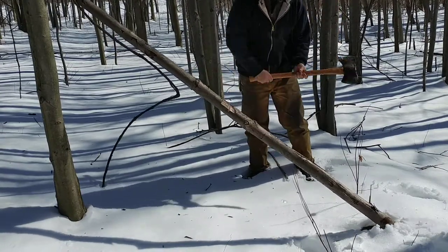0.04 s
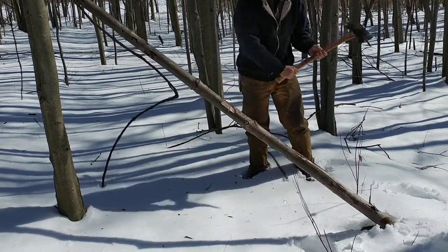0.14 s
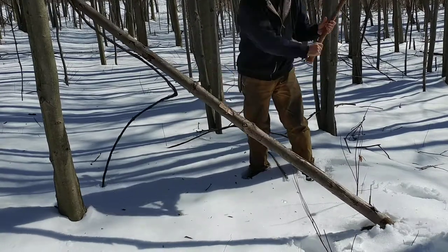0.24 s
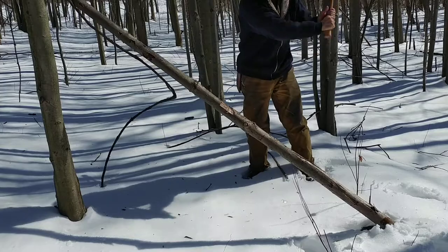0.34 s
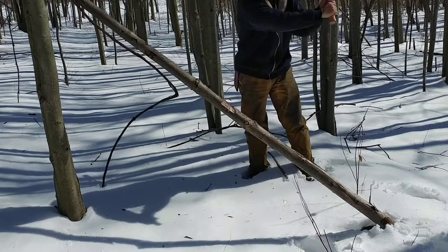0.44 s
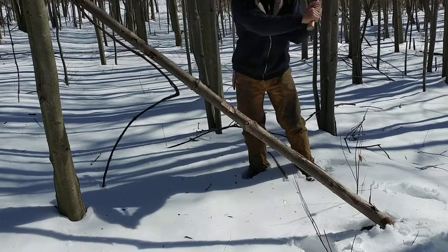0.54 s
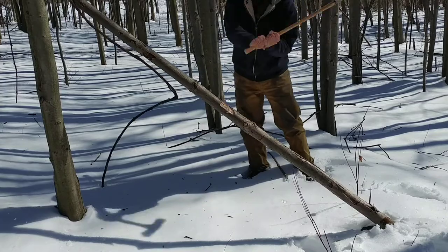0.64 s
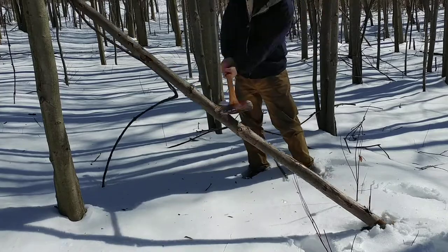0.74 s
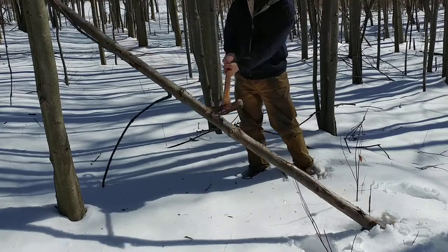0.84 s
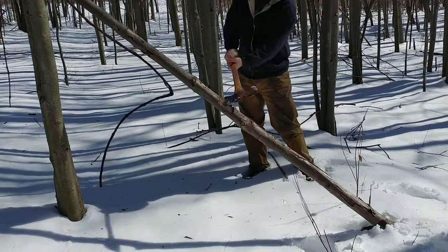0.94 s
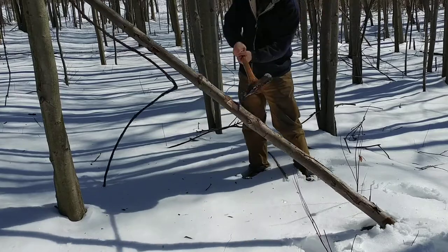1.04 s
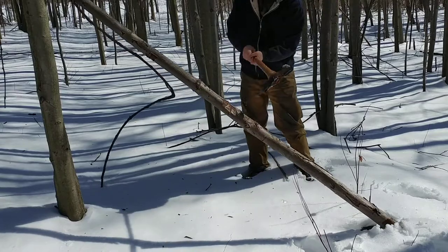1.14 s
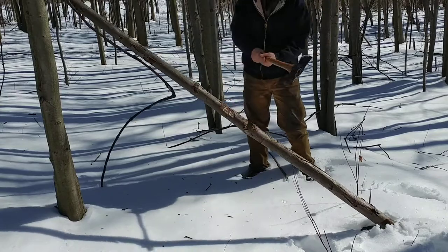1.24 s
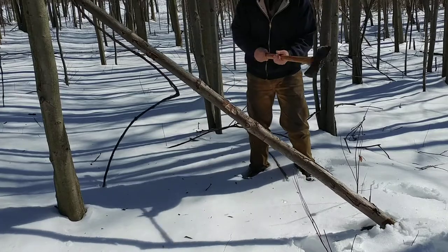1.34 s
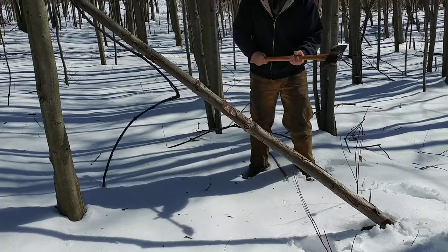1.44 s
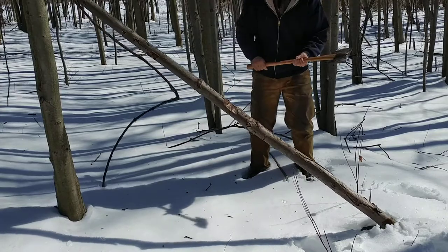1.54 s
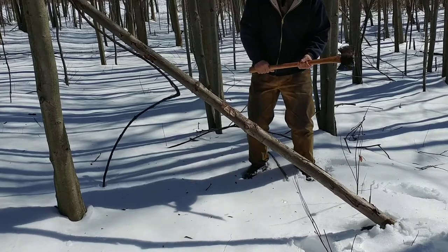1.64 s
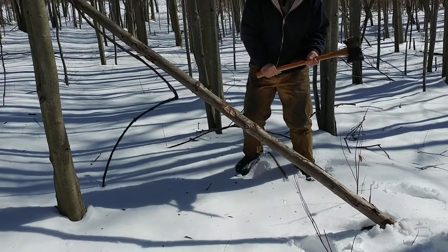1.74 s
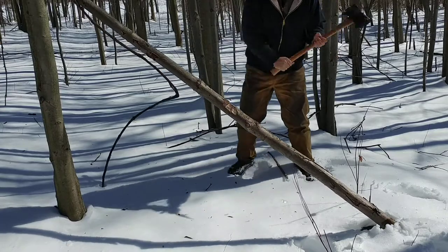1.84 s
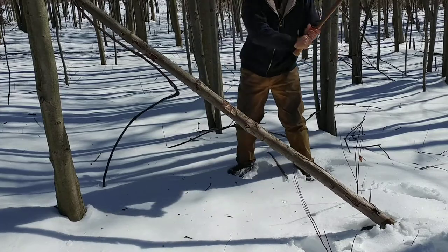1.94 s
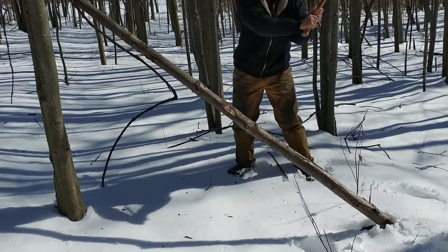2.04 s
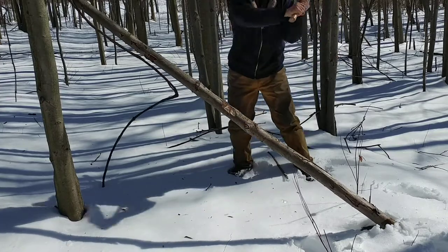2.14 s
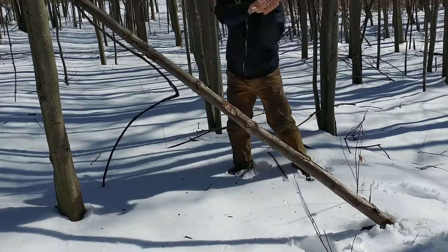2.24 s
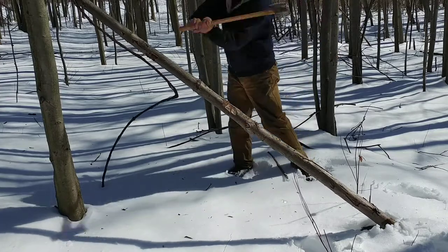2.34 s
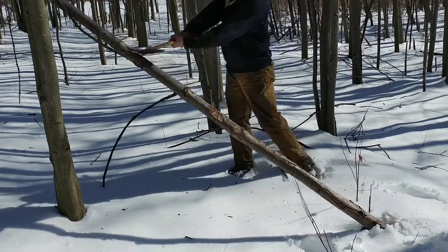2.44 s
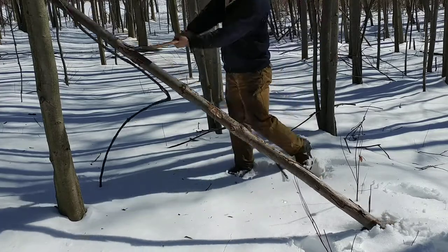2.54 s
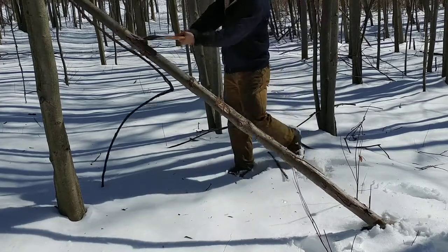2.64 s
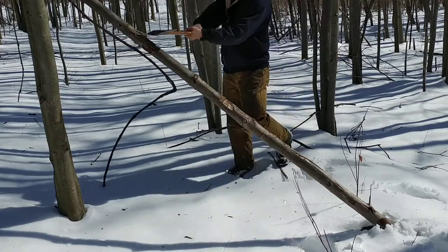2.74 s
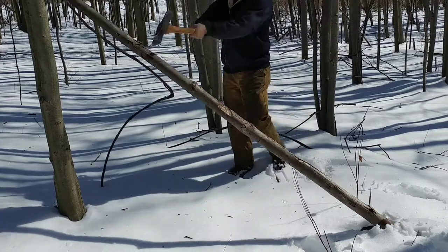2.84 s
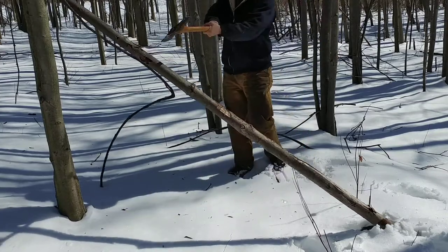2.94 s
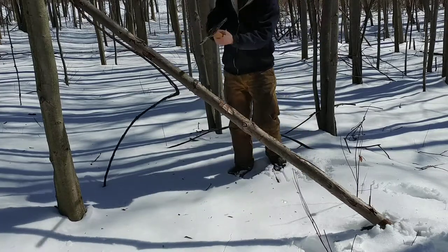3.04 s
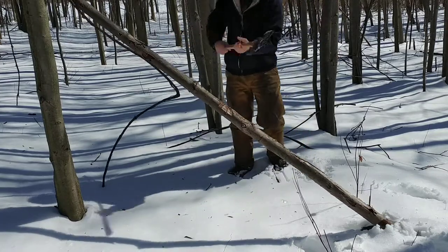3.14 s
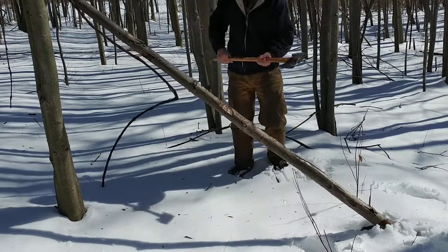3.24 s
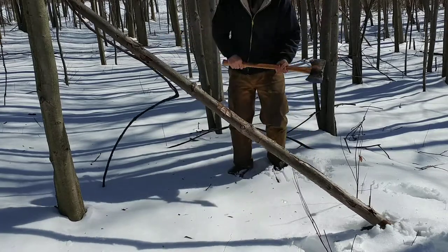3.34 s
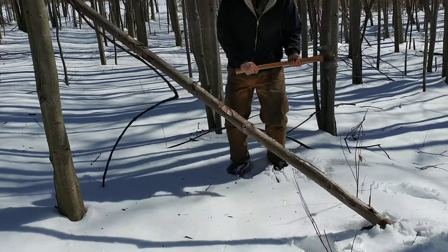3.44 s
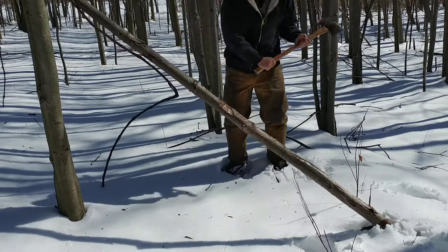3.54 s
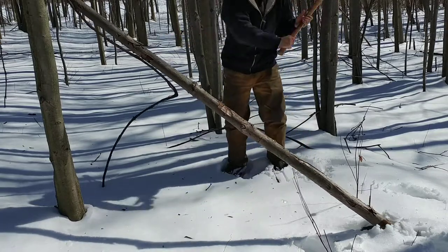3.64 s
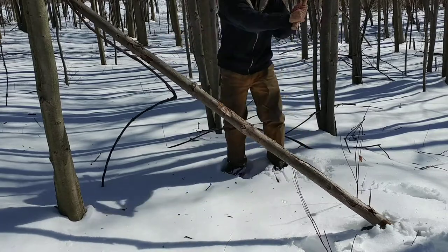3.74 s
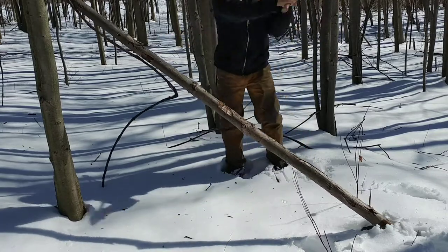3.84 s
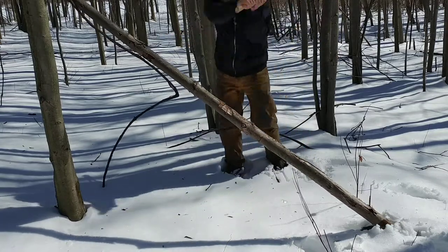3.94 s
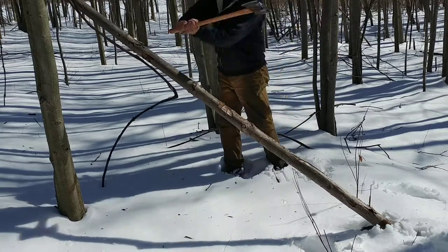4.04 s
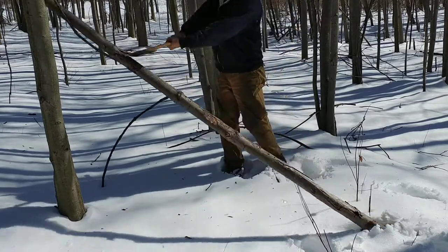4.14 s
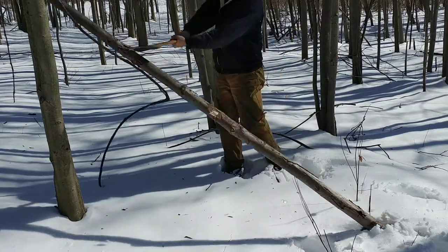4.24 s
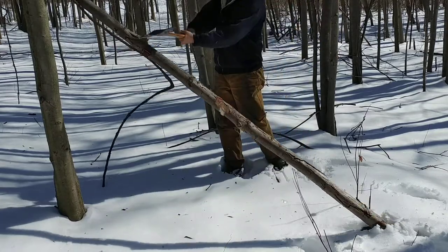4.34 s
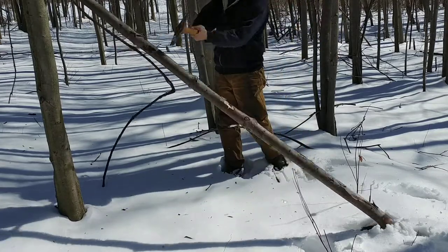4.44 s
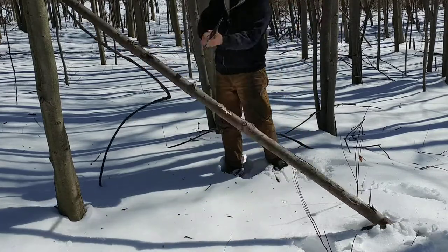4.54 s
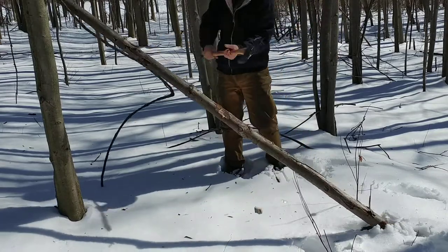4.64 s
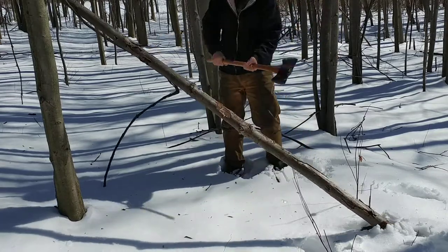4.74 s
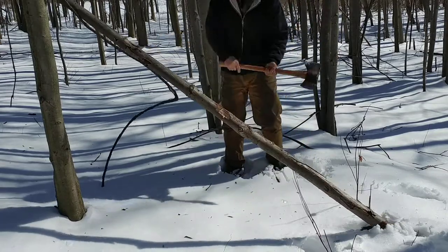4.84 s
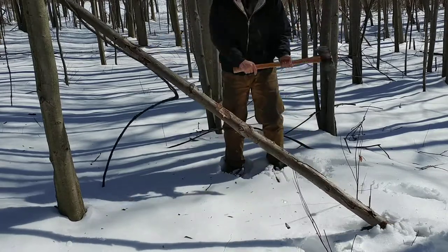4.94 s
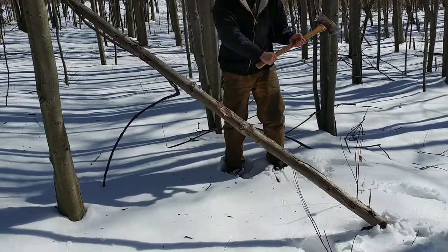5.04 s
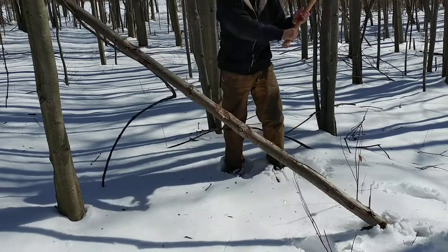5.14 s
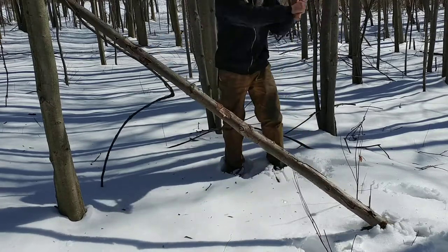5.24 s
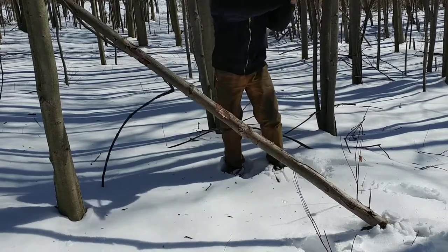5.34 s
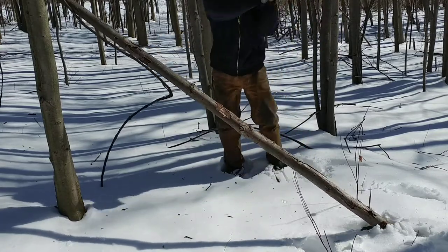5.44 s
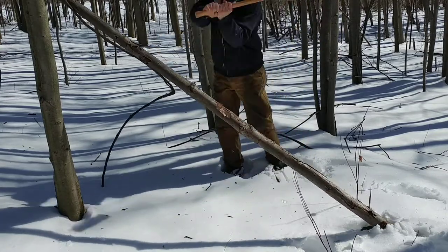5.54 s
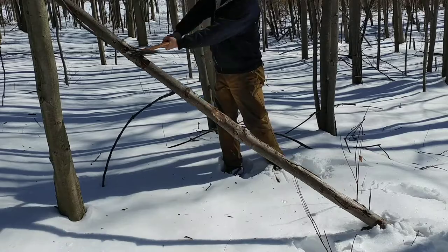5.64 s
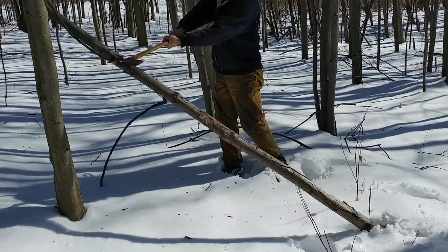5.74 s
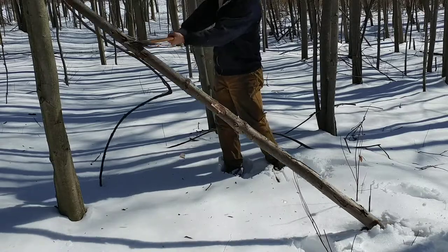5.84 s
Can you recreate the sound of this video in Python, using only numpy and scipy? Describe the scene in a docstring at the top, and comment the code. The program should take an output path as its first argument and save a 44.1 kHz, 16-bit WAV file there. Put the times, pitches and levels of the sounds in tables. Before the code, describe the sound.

Quiet winter woods with faint lumpy low wind and soft hiss; small jacket ticks. Then an axe strikes a dry leaning pole four times, roughly every one and a half to two seconds. Each sharp crack brings hollow, short-ringing knocks as the pole bounces, dull ground thumps, sifting snow and trunk echoes. Close stereo camera microphone, pole slightly left, uneven treble.

```python
"""Lumpy low wind and the faint murmur and hiss of snowy woods come first, noises in shaped colours, with a few
small cracks, jacket ticks and rustles of filtered noise. Then an axe chops a leaning dead pole: noise bursts
crack the wood, sines and ringing modes sound the dry pole as it bounces against its neighbours, and low noise
thumps the ground. Shaken snow sifts down as swelling hiss; trunks and far slopes scatter the sound back as
noise tails. A small stereo camera microphone with uneven treble hears it, the pole a little to the left."""
import sys
import numpy as np
from scipy import signal
from scipy.fft import rfft, irfft, next_fast_len
from scipy.io import wavfile
from scipy.ndimage import map_coordinates

SR = 44100
rng = np.random.default_rng(int(sys.argv[2]) if len(sys.argv) > 2 else 0)


def pcm_store(signal):
    """Save signal as 16-bit PCM."""
    levels = np.round(np.clip(np.atleast_2d(signal), -1, 1) * 32767)
    wavfile.write(sys.argv[1], SR, levels.astype(np.int16).T)


def voltage_ratio(level):
    """Linear amplitude factor for a level in decibels (scalar or array-like)."""
    return 10 ** (np.asarray(level, float) / 20)


N = 259308  # samples


def unit(x):
    """Scaled to rms 1."""
    return x / np.sqrt(np.mean(x ** 2) + 1e-20)


def along(points, hz):
    """Reads a curve of (Hz, value) points on a log frequency axis."""
    f, v = np.transpose(points)
    return np.interp(np.log(hz + 1), np.log(f + 1), v)


def curves(rows):
    """One value per sample for each column after the time."""
    s, *cols = np.transpose(rows)
    return [np.interp(np.arange(N) / SR, s, c) for c in cols]


def wobble(rate):
    """A smooth random curve, rate knots a second."""
    knots = rng.standard_normal(int(N * rate / SR) + 4)
    return map_coordinates(knots, [np.arange(N) * rate / SR])


def grit(n, depth_db, size):
    """Random gain steps, size samples long."""
    return voltage_ratio(depth_db * rng.standard_normal(n // size + 1)).repeat(size)[:n]


def filtered(x, response):
    """x times a complex response of frequency."""
    n = x.shape[-1]
    m = next_fast_len(n + 4096)
    return irfft(rfft(x, m) * response(np.fft.rfftfreq(m, 1 / SR)), m)[..., :n]


def resonance(f, hz, width):
    """Response of one causal resonance, 1 at its centre."""
    return 1j * f * width / (hz * hz - f * f + 1j * f * width)


def pair(n, alike):
    """Two noises with correlation alike."""
    a, b = rng.standard_normal((2, n))
    turn = np.arccos(np.clip(alike, 0, 1)) / 2
    return np.cos(turn) * a + np.sin(turn) * b * np.array([[1], [-1]])


def rush(spectrum, alike):
    """Stereo noise of rms 1 in a given colour."""
    return unit(filtered(pair(N, alike), lambda hz: voltage_ratio(along(spectrum, hz))))


def add(track, s, sound):
    """Lays a stereo sound on the track at s seconds."""
    part = track[:, round(s * SR):][:, :sound.shape[1]]
    part += sound[:, :part.shape[1]]


# The wind at the microphone ports. Each row: time in seconds, strength in dB.
WIND_STRENGTH = [(0.0, -63.5), (0.9, -65), (1.1, -54.5), (1.79, -67), (2.88, -53), (4.11, -62), (4.45, -53),
                 (5.36, -65), (5.88, -50)]
# Colour of that wind. Each row: frequency in Hz, relative level in dB.
WIND_COLOUR = [(13, -45.5), (22, -19), (36, -8.5), (59, 0.5), (135, -15), (291, -27.5), (330, -22),
               (430, -53.5), (730, -120)]
# Colour of the far woods. Each row: frequency in Hz, relative level in dB.
MURMUR_COLOUR = [(150, -36), (250, -9.5), (295, -16), (433, -9.5), (489, 1.5), (576, 2.5), (692, -5.5),
                 (914, -9.5), (997, -11), (1170, -18), (2000, -26.5), (2600, -67), (4400, -120)]


def air():
    """Slow random gains make the low wind lumpy on each port; the far woods murmur as wavering noise."""
    wind_db, = curves(WIND_STRENGTH)
    lumps = voltage_ratio(0.88 * wobble(7.5) + 0.94 * np.array([wobble(1.8), wobble(4.1)]))
    wind = voltage_ratio(wind_db) * unit(lumps * rush(WIND_COLOUR, alike=1.0))
    murmur = voltage_ratio(-63.5 + 1.5 * wobble(12.0)) * rush(MURMUR_COLOUR, alike=0.38)
    return wind + murmur


# Snow shaken from the branches by each blow. Each row: start in seconds, peak level in dB.
SNOW_SHOWERS = [(0.9, -59.5), (2.569, -53), (4.26, -50.5), (5.8, -54)]
# Colour of soft hiss, for snow and rubbing cloth. Each row: frequency in Hz, relative level in dB.
SOFT_HISS = [(900, -46.5), (1500, -14), (3000, -1), (8000, -3), (16000, -3)]


def rustle():
    """Soft hiss that swells as shaken snow sifts down, with a thin wavering band high in the treble."""
    hiss_db, shower_peak_s = -65, 0.25
    level = voltage_ratio(hiss_db)
    for s, db in SNOW_SHOWERS:
        since = np.clip(np.arange(N) / SR - s, 0, None) / shower_peak_s
        level = level + voltage_ratio(db) * since * np.exp(1 - since)
    flicker = voltage_ratio(3.3 * wobble(9.8) + 1.8 * wobble(390))
    hiss = level * unit(flicker * rush(SOFT_HISS, alike=0.13))
    thin = unit(filtered(pair(N, alike=0.2), lambda f: resonance(f, 11300, 350) ** 2))
    return hiss + voltage_ratio(-75 + 3 * wobble(3.2)) * thin


# Splitting fibres, chips and twigs close by. Each row: start in seconds, level in dB (before a 3 dB cut),
# centre in Hz, scatter in dB (before a 14 dB cut).
WOOD_CRACKS = [(0.1317, -44.5, 10000, -30), (0.5841, -41, 3990, -32), (0.9026, -4.5, 7020, -17),
               (0.9924, -24, 9950, -4), (0.9967, -14, 4980, -7.5), (0.9994, -5, 9300, -30.5),
               (1.024, -15, 7000, -13.5), (1.295, -37, 2655, -18), (1.3704, -37.5, 6850, -26),
               (1.448, -45.5, 3640, -24), (1.4644, -62, 8200, -16.5), (1.4855, -43, 7640, -26),
               (1.5713, -46, 7700, -31), (1.719, -52.5, 10680, -8), (1.794, -51, 10800, -8.5),
               (2.5706, -7, 7590, -17.5), (2.6221, -6.5, 7050, -9), (2.6444, -19, 7730, -12.5),
               (2.7473, -18, 2640, -6.5), (2.7539, -10.5, 3370, -12), (2.7555, -13, 1900, -16),
               (2.7605, -13, 2200, -20), (2.935, -31, 10500, -15), (2.978, -35, 10500, -18),
               (3.0826, -40, 7730, -17.5), (3.114, -34.5, 2370, -6.5), (3.314, -26, 7670, -17.5),
               (3.3135, -27, 1700, -26), (4.1178, -49.5, 7900, -19), (4.2555, -12.5, 8900, -9),
               (4.2586, -9, 9260, -28.5), (4.3082, -41, 2800, 10), (4.345, -22, 3000, -9.5),
               (4.3994, -40, 3400, -9), (4.413, -31, 10500, -17), (4.501, -34, 10300, -20),
               (4.434, -29, 10000, -8.5), (4.468, -29.5, 9600, -13.5), (4.4785, -39.5, 10300, -9),
               (4.568, -21.5, 10500, -24), (5.003, -35.5, 7400, -43), (5.1038, -33, 10400, -34.5),
               (5.3584, -31.5, 11340, -10), (5.374, -33, 10600, -31.5), (5.394, -32, 10500, -25),
               (5.64, -47.5, 8000, -10.5), (5.8034, -7, 10500, -16)]
# How long the trunks scatter sound. Each row: frequency in Hz, time to fall 60 dB in seconds.
TRUNK_DECAY = [(300, .5), (1000, 0.35), (3000, 0.52), (8000, 0.38), (15000, 0.33)]


def cracks():
    """A few ms of splintering noise, answered by the lumpy scatter of many trunks, drawn anew each time."""
    out, t = np.zeros((2, N)), np.arange(int(0.7 * SR)) / SR
    for s, db, hz, scatter_db in WOOD_CRACKS:
        breadth = voltage_ratio(17.5 + 0.99 * db)  # louder cracks are broader

        def colour(f):
            peak = resonance(f, hz, 0.5 * hz) ** 2
            broad = resonance(f, 3300, 18000)
            broad = broad / (1 + 1j * f / (2.2 * hz)) ** 2  # rolls off above 2.2 times the centre
            return peak + breadth * broad * (1j * f / (1j * f + 1200)) ** 2

        def blurred(f):  # scatter smears the colour
            return colour(f) + 0.5 * resonance(f, hz, 3.9 * hz)

        splinters = pair(len(t), alike=0.7) * grit(len(t), 4, size=16)
        burst = unit(filtered(splinters, colour)) * np.exp(-(t / 0.0041) ** 2)
        # each frequency of the scatter dies at its own rate
        f, u, z = signal.stft(pair(len(t), alike=0.21), SR, nperseg=256)
        fading = voltage_ratio(-60 * u / along(TRUNK_DECAY, f)[:, None])
        tail = signal.istft(z * fading, SR, nperseg=256)[1][:, :len(t)]
        lumps = grit(len(t), 1.5, size=150)
        tail = unit(filtered(tail * lumps, blurred)) * voltage_ratio(scatter_db - 14)
        add(out, s - 0.0005, voltage_ratio(db - 3.0) * (burst + tail))
    return out


# Small hard ticks of a jacket fastener by the microphone. Each row: start in seconds, level in dB (before a
# 4.5 dB cut), brightness in dB per octave.
JACKET_TICKS = [(0.397, -16, 4.5), (0.4, -26.5, -1), (0.4056, -27, -9.5), (0.5457, -32, -7.5),
                (0.551, -35, -12), (0.5588, -39, -2), (0.7437, -29.5, 4), (0.752, -41.5, 13.5)]
# Resonances of the fastener. Each row: frequency in Hz, width in Hz, relative level in dB.
FASTENER_MODES = [(3000, 600, -20), (5070, 500, -7), (7000, 810, -1.5), (10500, 2400, -7),
                  (13460, 1800, -12)]


def ticks():
    """Brief spiky noise through the fastener's few high resonances, with a faint short wash."""
    out, t = np.zeros((2, N)), np.arange(SR // 5) / SR
    for s, db, bright_db in JACKET_TICKS:
        def colour(f):
            return sum(voltage_ratio(mode_db + bright_db * np.log2(hz / 7000)) * resonance(f, hz, width) ** 2
                       for hz, width, mode_db in FASTENER_MODES)

        spiky = pair(len(t), alike=0.21) * grit(len(t), 2.4, size=16)
        noise = unit(filtered(spiky, colour))
        wash = voltage_ratio(-27.0 - 60 * t / 0.22)
        add(out, s - 0.0005, voltage_ratio(db - 4.5) * noise * (np.exp(-t / 0.0038) + wash))
    return out


# Rubbing cloth and pattering crumbs. Each row: start in seconds, length in seconds (where the swell is down
# to half), level in dB, centre in Hz.
CLOTH_SCRAPES = [(0.521, 0.046, -58, 5070), (0.567, .035, -52, 4840), (1.46, 0.04, -52.5, 8100),
                 (1.82, .06, -68, 7000), (1.928, 0.18, -57.5, 7000), (1.951, 0.13, -59, 3960),
                 (2.243, .1, -64, 5760), (2.909, .07, -47, 9530), (3.318, .12, -57, 8600),
                 (3.523, .18, -58.5, 7000), (3.742, 0.055, -73, 7000), (4.215, 0.031, -46, 5540),
                 (4.555, 0.079, -42, 9300), (4.729, 0.056, -50, 6160), (4.844, .012, -43.5, 7500),
                 (4.853, 0.032, -39.5, 3000), (4.872, 0.04, -44.5, 10700), (5.052, 0.025, -49.5, 9100),
                 (5.112, 0.035, -42.5, 3000), (5.097, 0.043, -41.5, 10100), (5.312, 0.07, -45.5, 3000),
                 (5.312, 0.044, -51, 7550), (5.312, .04, -52, 10500), (5.367, 0.026, -46, 9760)]


def scrapes():
    """Rubbing and pattering are short gritty swells of noise around one broad centre."""
    out = np.zeros((2, N))
    for s, length, db, hz in CLOTH_SCRAPES:
        u = np.arange(int(2 * abs(length) * SR)) / (abs(length) * SR)
        swell = (1 - np.exp(-(u / 0.15) ** 2)) / (1 + u ** 5)
        rough = pair(len(u), alike=0.088)
        rough = rough * grit(len(u), 3.5, size=120) * grit(len(u), 0.76, size=12)

        def colour(f):
            return (0.4 + resonance(f, hz, 0.47 * hz) ** 2) * voltage_ratio(along(SOFT_HISS, f))

        add(out, s, voltage_ratio(db) * swell * unit(filtered(rough, colour)))
    return out


# Blows and bounces of the pole, a little left of the microphone. Each row: start in seconds, level in dB,
# nominal pitch in Hz, brightness in dB per octave.
POLE_KNOCKS = [(0.902, -14, 848, 9.5), (0.912, -18.5, 700, -0.5), (0.919, -5, 611, 2.5),
               (0.931, -11, 640, -13.5), (0.942, -15, 593, 8), (0.96, -19, 800, 5), (0.985, -19, 695, 14),
               (1.009, -15.5, 655, 14.5), (1.022, -30, 728, 27.5), (1.107, -30, 574, 2.5),
               (1.201, -20.5, 697, 8), (1.291, -18.5, 891, 3), (1.517, -41.5, 530, 1.5),
               (2.06, -45, 654, 4.5), (2.101, -47.5, 534, 9), (2.335, -42, 573, -4.5),
               (2.569, -27.5, 555, 24.5), (2.574, -5.5, 739, 8.5), (2.599, -6, 725, 2.5),
               (2.621, -22, 620, 15.5), (2.643, -12.5, 650, 10.5), (2.747, -19.5, 900, 9),
               (2.752, -11.5, 1052, 13.5), (2.761, -20, 642, 13), (2.841, -20, 782, 6),
               (2.888, -19, 738, 4), (3.002, -22, 778, 10), (3.118, -26.5, 663, 14), (3.135, -26.5, 657, 4),
               (3.253, -28, 801, 2.5), (3.312, -34, 643, 1.5), (3.415, -45.5, 550, -1.5),
               (3.887, -47, 587, -4), (3.989, -44, 570, -19), (4.254, -20.5, 577, 3), (4.261, -3.5, 759, 7),
               (4.295, -10.5, 606, 9.5), (4.36, -20.5, 730, 4.5), (4.368, -10.5, 772, 7.5),
               (4.43, -24, 680, 9.5), (4.45, -17, 734, -4), (4.478, -12.5, 895, 5.5),
               (4.522, -13.5, 903, 7.5), (4.539, -26.5, 910, 15), (4.579, -19, 730, 4),
               (4.652, -18, 654, 6.5), (4.668, -24, 640, -5), (4.726, -17.5, 580, 7),
               (4.745, -11, 798, 4.5), (4.791, -22, 600, 6), (4.846, -22, 606, -6), (4.993, -37, 492, -17),
               (5.056, -24.5, 768, 3), (5.13, -38.5, 820, 7.5), (5.353, -24.5, 775, 1),
               (5.365, -29.5, 827, -0.5), (5.381, -28, 710, 1.5), (5.801, -11, 629, 3), (5.806, -7, 788, 9),
               (5.823, -18, 578, 5.5), (5.849, -6, 830, 1.5)]
# Modes of the dry pole. Each row: frequency in Hz, width in Hz, relative level in dB.
POLE_MODES = [(296, 50, -16), (370, 35, -14), (470, 40, -10), (561, 45, -4), (636, 35, -1), (713, 35, 0),
              (790, 40, -5), (845, 30, -4), (931, 40, -5), (1082, 50, -10), (1250, 150, -12),
              (1550, 450, -15), (2100, 900, -18), (3200, 1600, -21)]


def pole():
    """Each contact is a short wooden tock, then the pole's modes ring unevenly, high ones dying first."""
    ring_t60_s = 0.19  # at 700 Hz
    bright_top_hz = 1500  # brightness lifts modes no further above this
    out, t = np.zeros((2, N)), np.arange(SR // 3) / SR
    mode_hz, width, mode_db = np.transpose(POLE_MODES)[:, :, None, None]
    octaves = np.log2(np.minimum(mode_hz, bright_top_hz) / 700)
    fading = voltage_ratio(-60 * t / ring_t60_s * (mode_hz / 700) ** 0.9)
    for s, db, hz, bright_db in POLE_KNOCKS:
        def partial(ratio, life):
            return np.sin(2 * np.pi * ratio * hz * t) * voltage_ratio(-60 * t / life)

        tock = partial(0.96, life=0.033) + voltage_ratio(bright_db - 9.5) * partial(1.528, life=0.011)
        tock *= 1.37 * (1 - np.exp(-t / 0.0009))
        lean = 0.39 + abs(resonance(mode_hz, hz, 1000))  # the place of contact favours its own pitch
        uneven_db = 4.6 * rng.standard_normal(mode_db.shape)
        strength = lean * voltage_ratio(mode_db + bright_db * octaves + uneven_db) / np.sqrt(width)
        noise = pair(len(t), alike=0.51)
        modes = strength * filtered(noise, lambda f: resonance(f, mode_hz, width) ** 2)
        ring = (modes * fading).sum(0) / np.sqrt(np.mean(modes.sum(0) ** 2))
        ring *= voltage_ratio(-10 + 0.7 * bright_db)  # a harder, brighter contact rings the pole more
        ring *= 1 - np.exp(-t / 0.00082)
        add(out, s - 0.001, voltage_ratio(db) * (tock + ring))
    return out


# The pole's foot jolts the ground. Each row: start in seconds, level in dB (before a 5 dB cut), pitch in Hz.
GROUND_THUMPS = [(0.904, -25, 88.5), (0.939, -26.5, 119), (0.999, -28.5, 66), (1.29, -42, 90),
                 (1.99, -43.5, 90.7), (2.1, -45, 86), (2.331, -52, 103), (2.574, -31, 102),
                 (2.631, -25.5, 63), (2.747, -33, 89), (3.119, -51.5, 62), (3.308, -38.5, 56.5),
                 (4.26, -34.5, 68.6), (4.288, -23, 167), (4.37, -26, 64), (4.749, -40, 99),
                 (4.85, -43.5, 115), (4.996, -46.5, 86), (5.62, -52, 68.7), (5.804, -28.5, 91.2),
                 (5.848, -29, 134)]


def thumps():
    """The jolted ground gives dull low noise with a soft start, one broad resonance and a weaker one above."""
    t60_s = 0.34
    out, t = np.zeros((2, N)), np.arange(SR // 2) / SR
    for s, db, hz in GROUND_THUMPS:
        def colour(f):
            return resonance(f, hz, 0.87 * hz) ** 2 + 0.17 * resonance(f, 220, 170) ** 2

        dull = unit(filtered(pair(len(t), alike=1.0), colour))
        soft_start = 1 - np.exp(-t / 0.0066)
        add(out, s, voltage_ratio(db - 5.0 - 60 * t / t60_s) * soft_start * dull)
    return out


def lingering(x, db, rise_s, t60):
    """x through a diffuse noise tail that swells and dies, different at each port."""
    t = np.arange(3 * SR // 2) / SR
    tail = pair(len(t), alike=0.22) * (1 - np.exp(-(t / rise_s) ** 2)) * voltage_ratio(-60 * t / t60)
    return voltage_ratio(db) * signal.fftconvolve(x, tail / np.linalg.norm(tail[0]), axes=1)[:, :N]


def scene():
    """The pole stands a little to the left: near sounds reach that port first, then the far answers come."""
    left_lead_s = 0.000216
    wood, ground = pole(), thumps()
    near = wood + ground + ticks() + cracks() + scrapes()
    delay_s = left_lead_s * np.array([[0], [1]])
    near = filtered(near, lambda f: np.exp(-2j * np.pi * f * delay_s))
    slopes = lingering(wood, -18.5, rise_s=0.064, t60=1.08)  # far slopes and trunks answer the pole
    sway = lingering(ground, -12.5, rise_s=0.034, t60=1.94)  # the pole rocks on after a jolt
    return near + slopes + sway + air() + rustle()


def top_cut(x):
    """Nothing passes above the cut-off."""
    return signal.sosfilt(signal.butter(12, 16810, fs=SR, output="sos"), x)


# Colour of the small camera microphone. Each row: frequency in Hz, gain in dB.
MIC_COLOUR = [(2000, 3), (4000, -4), (5500, -3), (7500, 3), (8300, -2.5), (9000, -11), (10200, 0.5),
              (11300, -5.5), (12500, -8.5), (16000, -17.5), (16700, -22.5), (17100, -69.5)]
# Its two ports compared. Each row: frequency in Hz, left minus right in dB.
PORT_TILT = [(60, 9.5), (110, -9.5), (200, 1.5), (380, -0.5), (700, -1), (1290, -1), (2380, -1.5),
             (4400, -1), (8120, 3.5), (15000, 18)]


def record(dry):
    """The ports colour the sound, the right duller in the high treble; a low cut and soft clipping follow."""
    side = np.array([[0.5], [-0.5]])

    def ports(f):
        low_cut = (1j * f / (1j * f + 26)) ** 4
        return voltage_ratio(along(MIC_COLOUR, f) + side * along(PORT_TILT, f)) * low_cut

    x = filtered(dry, ports)
    x = x / (1 + np.abs(x / 0.85) ** 6) ** (1 / 6)  # soft clip towards 0.85
    return top_cut(x)


dry = scene()
out = record(dry)
pcm_store(out)
```